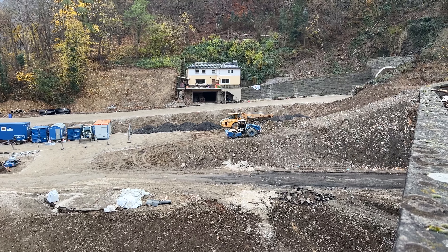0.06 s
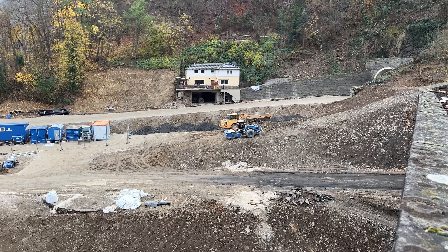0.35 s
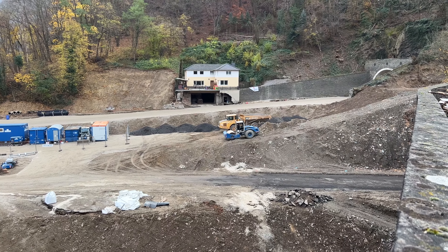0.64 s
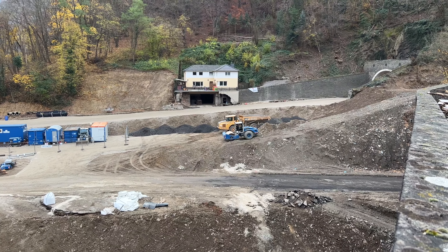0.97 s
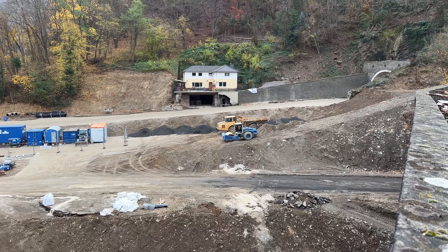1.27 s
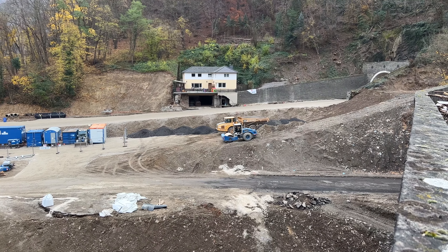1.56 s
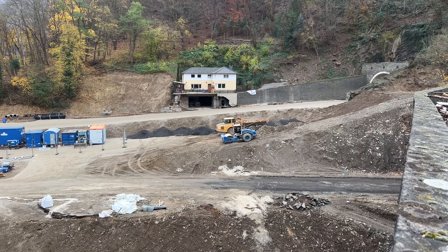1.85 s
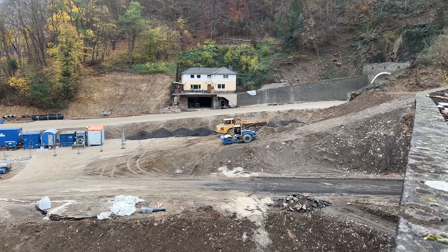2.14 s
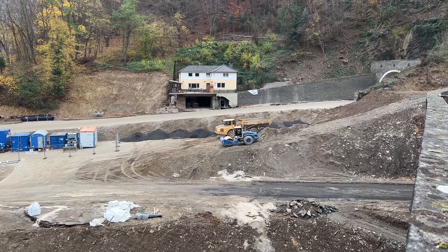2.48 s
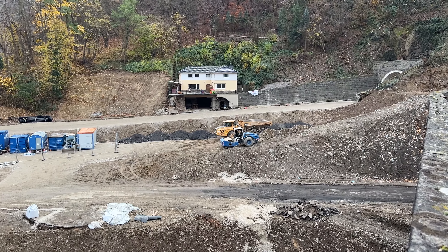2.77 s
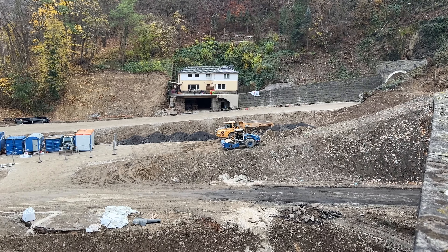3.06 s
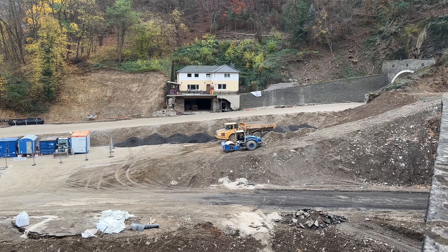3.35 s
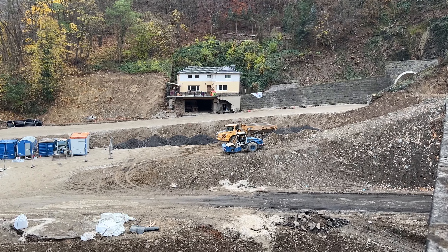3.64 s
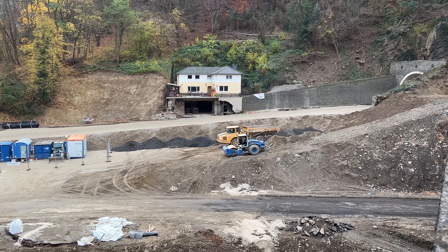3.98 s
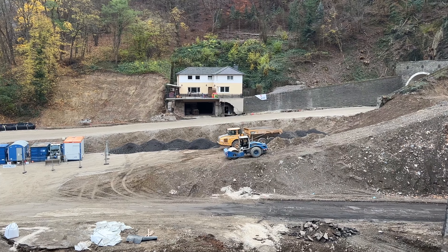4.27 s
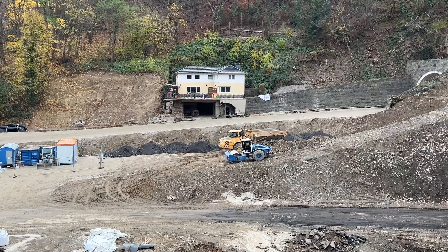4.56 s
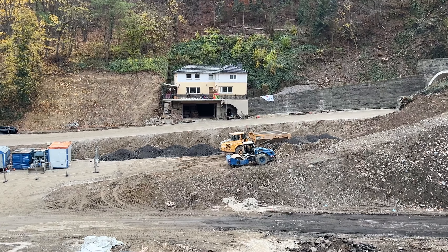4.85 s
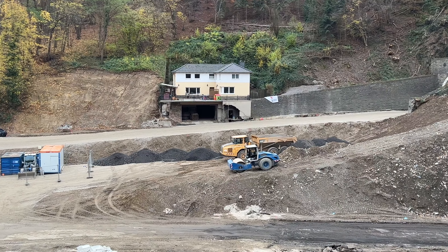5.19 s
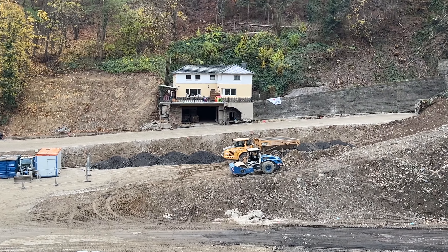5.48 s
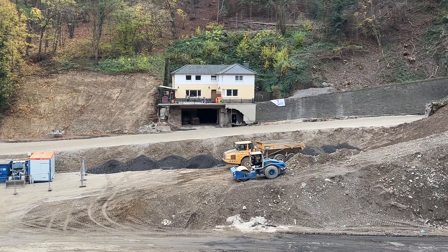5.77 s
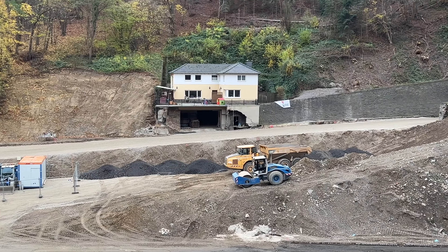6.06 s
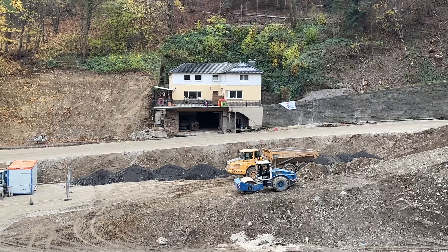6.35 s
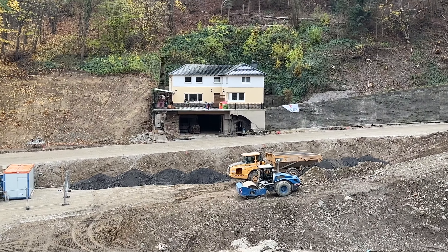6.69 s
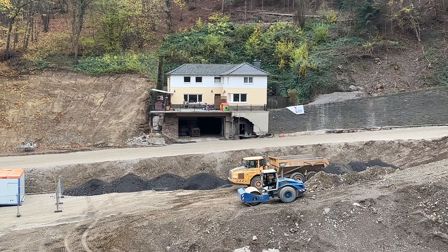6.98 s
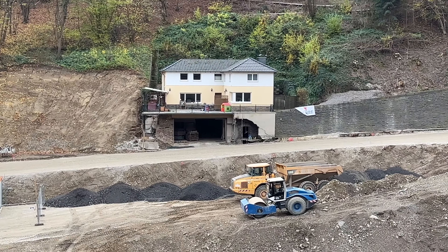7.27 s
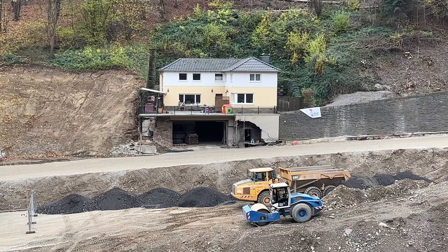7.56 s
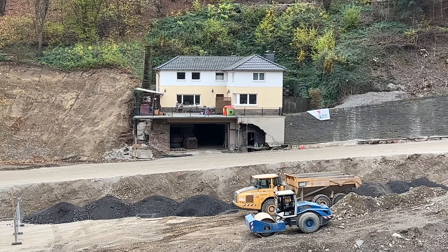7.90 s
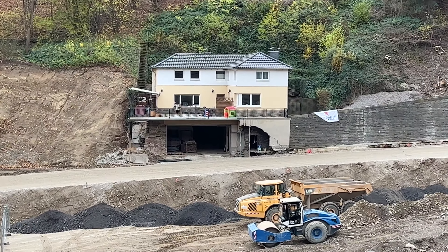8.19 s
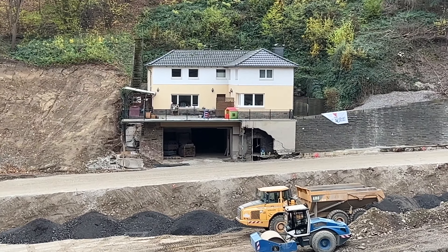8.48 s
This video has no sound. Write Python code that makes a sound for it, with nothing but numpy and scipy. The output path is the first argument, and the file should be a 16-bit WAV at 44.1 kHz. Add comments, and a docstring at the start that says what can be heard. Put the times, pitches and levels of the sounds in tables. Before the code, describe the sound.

Construction machinery drones far off under an even outdoor rush, while soft gusts thump against the microphone.

```python
"""A diesel engine hums at a steady speed on a building site, heard from high above a wooded valley.
Its firings pulse out of the exhaust, other machinery drones beside it, and a broad distant rush
fills the valley. Light wind rumbles and bumps on the microphone; one faint double click sounds close by.
Midway the microphone zooms in: the wide treble draws together in the centre."""
import sys
import numpy as np
from scipy import signal
from scipy.io import wavfile

SR = 44100
rng = np.random.default_rng(int(sys.argv[2]) if len(sys.argv) > 2 else 0)


def master(y):
    """Save y as 16-bit WAV."""
    cut = np.clip(np.atleast_2d(y).T, -1, 1)
    pcm = np.round(cut * 32767)  # scale
    wavfile.write(sys.argv[1], SR, pcm.astype(np.int16))


N = 380583
SIDE = np.array([[1], [-1]])  # left, right


# engine speed: t/s, firing rate/Hz
FIRING_RATE = [(0, 51.83), (2.35, 51.6), (3.0, 50.9), (4.4, 51), (5.1, 51.53), (8.63, 51.7)]
# exhaust harmonics: multiple of firing rate, relative level/dB
EXHAUST_HARMONICS = [(1, -0.76), (2, -12.5), (3, -20), (4, -26.5), (5, -35), (6, -35)]

def diesel(base_db=-43.5, swell_db=2, waver_db=1.4, wander_rad=0.16, pan_db=-0.5, left_lead_s=0.00032):
    """Each firing pushes a rounded pulse from the exhaust; moving air makes higher harmonics waver more."""
    firing_hz = in_time(FIRING_RATE)[0]
    phase = 2 * np.pi * np.cumsum(firing_hz) / SR + rng.uniform(0, 2 * np.pi)
    phase = phase + np.pi * firing_hz * left_lead_s * SIDE
    out = 0
    for k, (multiple, db) in enumerate(EXHAUST_HARMONICS):
        path_rad = wander_rad * (k + .5) * drift(2.1)
        gain = from_db(db + waver_db * np.sqrt(k + .5) * drift(5.0))
        out = out + gain * np.cos(multiple * phase + path_rad)
    level_db = base_db + swell_db * hump(4.54, 0.93)  # carries better for a while
    return np.sqrt(2) * out * from_db(level_db + pan_db / 2 * SIDE)


# machine tones: f/Hz, wander span/Hz, base level/dB
MACHINE_TONES = [(128.9, 4, -62), (135.7, 2.6, -58), (141, 3, -62), (149, 4.95, -65), (181.5, 9, -70),
                 (216, 9, -73)]
# how well they carry across the valley: t/s, gain/dB
MACHINE_CARRY = [(0, -0.3), (0.6, -0.3), (1.3, 1.5), (2.3, 1.7), (3.8, -1.3), (5.1, -0.3), (6.0, -1),
                 (7.1, 0), (8.6, -0.3)]

def machinery(waver_db=2.0, spread_rad=0.24, echo_db=-61.0, pan_db=-1.2):
    """Far engine tones wander in pitch and beat; the slopes add a dull echo."""
    out = from_db(echo_db) * stereo_noise(110, 175, correlation=0.97)
    for hz, wander_hz, db in MACHINE_TONES:
        tone_hz = hz + wander_hz / 2 * drift(2.087)
        phase = 2 * np.pi * np.cumsum(tone_hz) / SR + rng.uniform(0, 2 * np.pi)
        ear_rad = spread_rad / 2 * drift(1.3) * SIDE
        gain = from_db(db + waver_db * drift(3.3))
        out = out + np.sqrt(2) * gain * np.cos(phase + ear_rad)
    return out * from_db(in_time(MACHINE_CARRY)[0] + pan_db / 2 * SIDE)


# rush spectrum, wide: f/Hz, relative density/dB
WIDE_SPECTRUM = [(200, -3), (280, -3.5), (450, -6), (620, -6.5), (850, -10), (1200, -12.5), (1800, -18),
                 (2700, -21.5), (4200, -30.5), (5700, -34), (7000, -39), (8200, -38.5), (9400, -50.5),
                 (10300, -53)]
# rush spectrum, zoomed in: f/Hz, relative density/dB
ZOOMED_SPECTRUM = [(200, -2), (280, -3.5), (450, -6), (620, -7), (850, -11), (1200, -12.5), (1800, -18.5),
                   (2700, -20.5), (4200, -29.5), (5700, -33.5), (7000, -39.5), (8200, -40), (9400, -52),
                   (10300, -53.5)]
# swells and lulls: t/s, width/s, body gain/dB, treble gain/dB
SWELLS = [(0.6, 0.083, 0.9, 0), (1.22, .11, 1.3, 1.3), (1.77, 0.075, 1, 0.5), (3.1, 0.42, -0.4, -3),
          (4.05, 0.086, 0.5, 0.5), (4.45, .4, 0, -1.5), (5.7, 0.43, 0, 0.3), (5.97, .1, 0.2, 1.6),
          (6.92, 0.11, -0.5, -1), (7.35, .12, 0.9, -0.1), (7.85, 0.15, 1.5, 0.5), (8.28, .12, 0, -1.5)]
# leftward bias, wide: f/Hz, side-mid correlation in phase, same a quarter cycle ahead
RUSH_BIAS = [(200, -0.2, 0.64), (378, 0.06, 0.7), (700, .18, .55), (1260, .15, .6), (1990, .22, -0.1),
             (3000, .4, -0.3), (4020, .36, 0.1), (5200, .66, -0.02), (7000, .6, -0.06), (8500, 0.2, 0.1)]
# stereo width: f/Hz, side re mid wide/dB, side re mid zoomed in/dB
RUSH_WIDTH = [(198, -11, -14.5), (358, -6, -7.5), (640, -1.8, -3.8), (1180, 1, -1), (1630, 4, -0.7),
              (1980, 1, -8), (2400, 0, -19), (3000, 1, -22.5), (3600, -4.5, -34), (5000, 2.5, -34),
              (8400, -3, -19), (9800, 0, 3.5)]
# microphone zoom: t/s, position (0 wide, 1 narrow)
MIC_ZOOM = [(0, 0.011), (2.1, 0), (3.05, 0.14), (3.95, 0.28), (4.2, 0.42), (4.5, 1), (8.6, 1)]

def valley_rush(base_db=-57, body_fade_db_per_s=0.1168, flicker_db=1.0, split_hz=2800, centring=0.9):
    """Distant rush, band by band; zooming changes its colour and pulls it to the centre."""
    body_db = base_db + sum(db * hump(s, width) for s, width, db, _ in SWELLS)
    body_db -= body_fade_db_per_s * np.arange(N) / SR
    treble_db = base_db + sum(db * hump(s, width) for s, width, _, db in SWELLS)
    zoom = in_time(MIC_ZOOM)[0]
    edges_hz = np.geomspace(760, 13800, 29) - 600
    centres_hz = np.sqrt(edges_hz[1:] * edges_hz[:-1])
    total_power = np.sum(np.diff(edges_hz) * from_db(at_hz(WIDE_SPECTRUM, centres_hz)[0]) ** 2)
    out = 0
    for low, high, hz in zip(edges_hz, edges_hz[1:], centres_hz):
        colour_db = (1 - zoom) * at_hz(WIDE_SPECTRUM, hz)[0] + zoom * at_hz(ZOOMED_SPECTRUM, hz)[0]
        treble_share = 1 / (1 + (split_hz / hz) ** 4)
        level_db = (1 - treble_share) * body_db + treble_share * treble_db
        gain = from_db(colour_db + level_db + flicker_db * drift(10.0))
        gain *= np.sqrt((high - low) / total_power)
        mid, diffuse = band_noise(low, high, order=3), band_noise(low, high, order=3)
        # positive shares of mid and of its slope make the left ear louder and earlier
        lean, lead = at_hz(RUSH_BIAS, hz)
        lean = lean * (1 - centring * zoom)
        directed = lean * mid + lead * rms_one(np.gradient(mid))
        side = directed + np.sqrt(1 - lean ** 2 - lead ** 2) * diffuse
        wide_db, zoomed_db = at_hz(RUSH_WIDTH, hz)
        side *= from_db(wide_db + zoom * (zoomed_db - wide_db))
        out = out + gain * (mid + side * SIDE)
    return out


# eddies at the microphone: t/s, level/dB, f/Hz
EDDIES = [(1.332, -43, 70), (1.775, -39, 100), (2.034, -40.5, 100), (2.069, -39.5, 92), (2.128, -37, 100),
          (2.416, -39, 95), (2.561, -38, 62), (3.150, -34.5, 68), (3.728, -39.5, 66), (4.141, -37, 80),
          (4.467, -33, 68), (4.744, -40.5, 80), (4.854, -40.5, 72), (5.278, -35.5, 65), (5.610, -38, 100),
          (5.627, -34.5, 60), (5.708, -34.5, 64), (5.852, -34, 58), (5.880, -36, 80), (6.640, -40.5, 115),
          (6.679, -32.5, 76), (6.725, -36, 95), (6.766, -32, 92), (6.831, -32.5, 70.4), (6.867, -39, 70),
          (7.887, -27.3, 65), (8.098, -37.5, 58)]

def wind_bumps(trim_db=-0.5, rise_cycles=0.38, fall_cycles=0.72, front_speedup=1.42):
    """An eddy gives a steep-fronted pressure pulse, which the microphone turns into a dull thump."""
    out = np.zeros(N + SR)
    age_s = np.arange(-SR // 10, SR // 10) / SR
    width_cycles = np.where(age_s < 0, rise_cycles, fall_cycles)
    for s, db, hz in EDDIES:
        cycles = age_s * hz * np.where(age_s < 0, front_speedup, 1)
        thump = np.exp(-.5 * (cycles / width_cycles) ** 2) * np.cos(2 * np.pi * cycles)
        start = int((s + age_s[0]) * SR)
        out[start:start + len(thump)] += from_db(db + trim_db) * thump
    return out[:N]


def wind_rumble(breeze_db=-58.6, gust_re_eddy_db=-25, gust_width_s=0.082, lumps_db=2.0):
    """Lumpy low rumble of moving air, swelling around each eddy in step with its strength."""
    gust_power = sum(from_db(db + gust_re_eddy_db) ** 2 * hump(s, gust_width_s) for s, db, _ in EDDIES)
    envelope = np.sqrt(from_db(breeze_db) ** 2 + gust_power) * from_db(lumps_db * drift(2.5))
    return envelope * stereo_noise(42, 88, correlation=0.74)


# clicks: t/s, peak level/dB
CLICKS = [(5.9437, -56), (5.946, -52.5)]

def double_click(centre_hz=4750, edge_ratio=1.34, decay_s=.0008):
    """A faint, dry double click close by."""
    out = 0
    for s, db in CLICKS:
        age_s = np.arange(N) / SR - s
        burst = (age_s > 0) * np.exp(-abs(age_s) / decay_s) * rng.standard_normal(N) + 1e-18
        click = band(burst, centre_hz / edge_ratio, centre_hz * edge_ratio, order=3)
        out = out + from_db(db) * click / abs(click).max()
    return out


def from_db(db):
    """Decibels to gain."""
    return 10 ** (np.asarray(db) / 20)


def rms_one(x):
    """Scale to unit power."""
    return x / np.sqrt(np.mean(x ** 2) + 1e-20)


def in_time(rows):
    """Each column of a curve at every sample."""
    s, *columns = np.transpose(rows)
    return [np.interp(np.arange(N) / SR, s, c) for c in columns]


def at_hz(rows, hz):
    """Each column of a spectrum at the given frequency."""
    known_hz, *columns = np.transpose(rows)
    return [np.interp(np.log(hz), np.log(known_hz), c) for c in columns]


def hump(centre_s, width_s):
    """Gaussian rise and fall, height 1."""
    return np.exp(-.5 * ((np.arange(N) / SR - centre_s) / width_s) ** 2)


def drift(corner_hz, hop=40, settle_steps=2000):
    """Slow random wander, rms 1."""
    pole = np.exp(-2 * np.pi * corner_hz * hop / SR)
    white = rng.standard_normal(N // hop + settle_steps + 2)
    slow = signal.lfilter([1], [1, -2 * pole, pole * pole], white)[settle_steps:]
    return np.interp(np.arange(N) / hop, np.arange(len(slow)), rms_one(slow))


def band(x, low_hz, high_hz, order=2):
    """Butterworth band-pass."""
    return signal.sosfilt(signal.butter(order, [low_hz, high_hz], "band", fs=SR, output="sos"), x)


def band_noise(low_hz, high_hz, order=2):
    """Steady noise in one band, rms 1."""
    return rms_one(band(rng.standard_normal(N + SR // 4), low_hz, high_hz, order)[-N:])


def stereo_noise(low_hz, high_hz, correlation):
    """Band noise with the given left-right correlation."""
    mid, side = band_noise(low_hz, high_hz), band_noise(low_hz, high_hz)
    return np.sqrt((1 + correlation) / 2) * mid + np.sqrt((1 - correlation) / 2) * side * SIDE


def scene():
    """Machines and valley far off, wind and a double click close by."""
    return diesel() + machinery() + valley_rush() + wind_bumps() + wind_rumble() + double_click()


def record(dry, cutoff_hz=12800):
    """Steep low-pass on the top of the treble."""
    return signal.sosfilt(signal.ellip(10, .1, 80, cutoff_hz, fs=SR, output="sos"), dry)


dry = scene()
out = record(dry)
master(out)
```